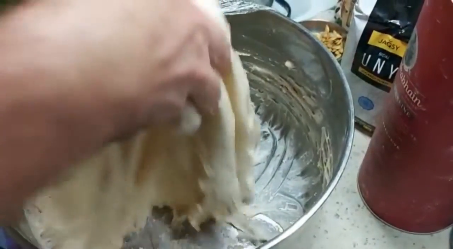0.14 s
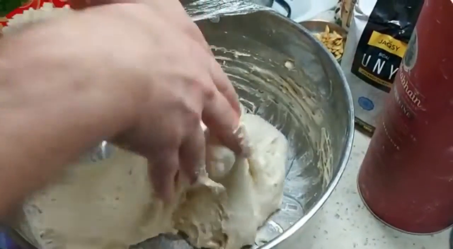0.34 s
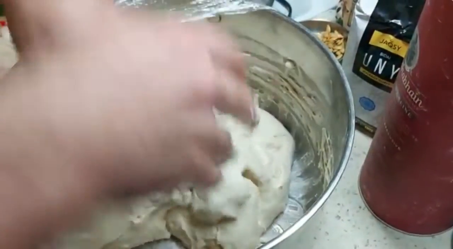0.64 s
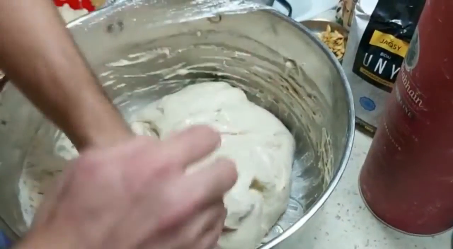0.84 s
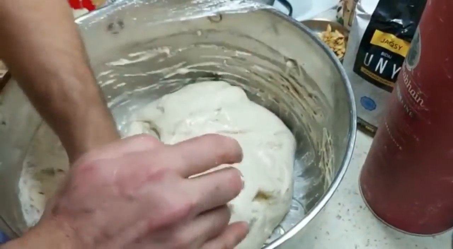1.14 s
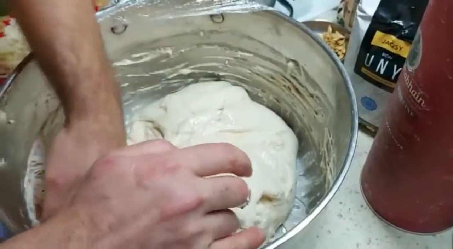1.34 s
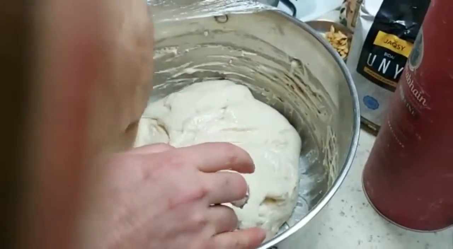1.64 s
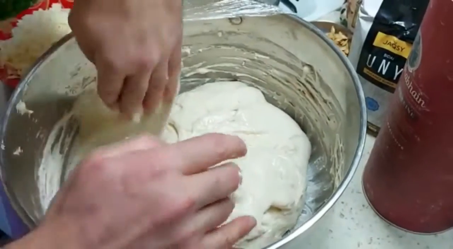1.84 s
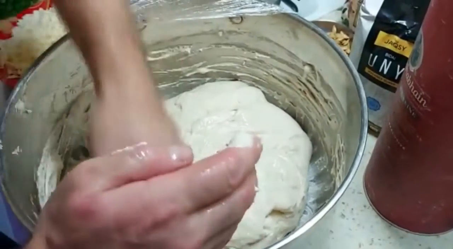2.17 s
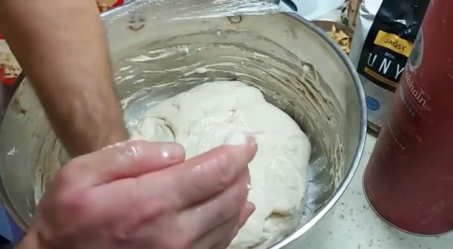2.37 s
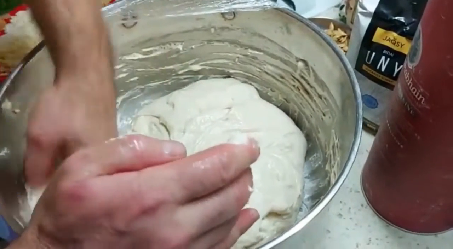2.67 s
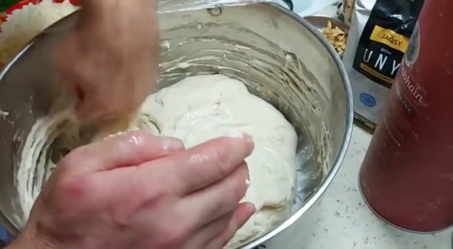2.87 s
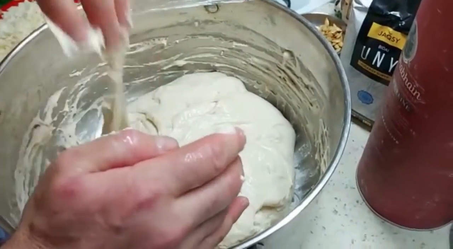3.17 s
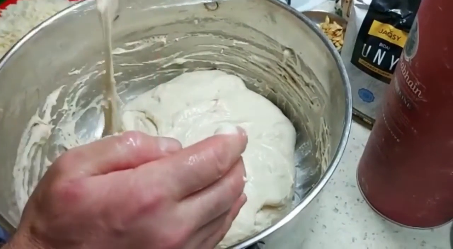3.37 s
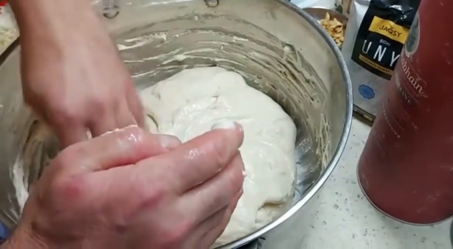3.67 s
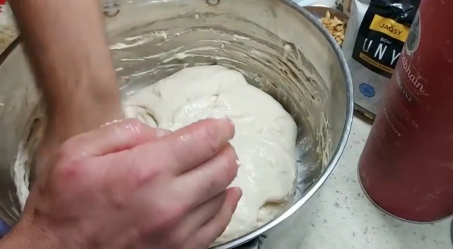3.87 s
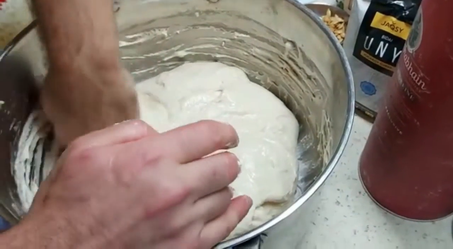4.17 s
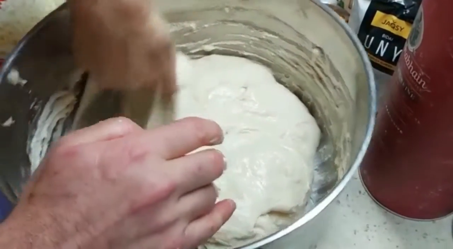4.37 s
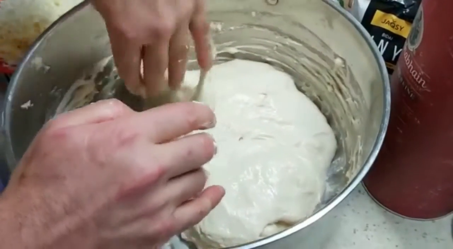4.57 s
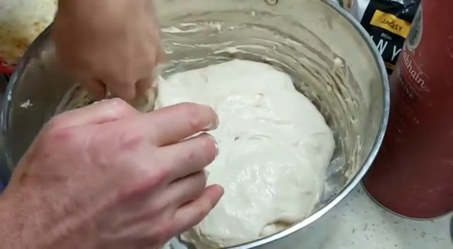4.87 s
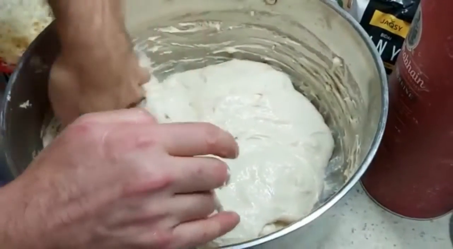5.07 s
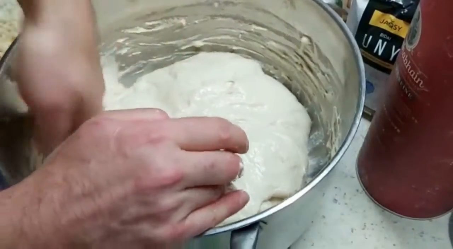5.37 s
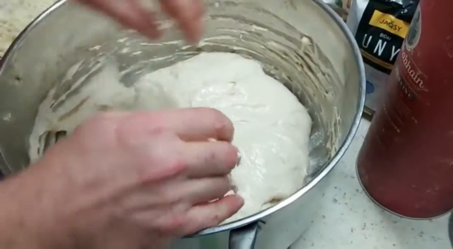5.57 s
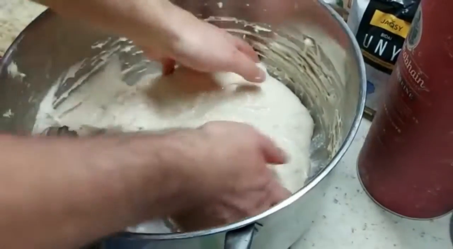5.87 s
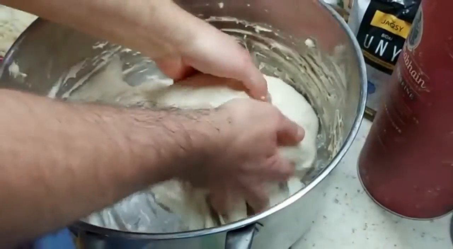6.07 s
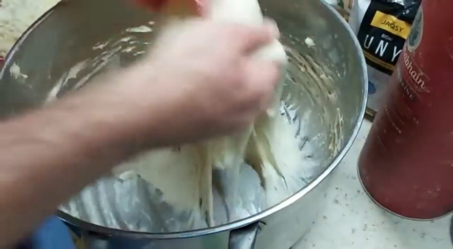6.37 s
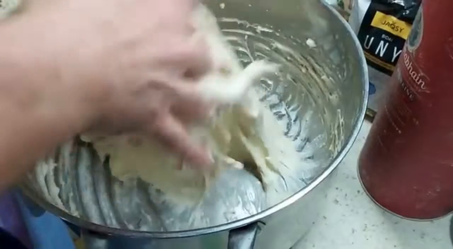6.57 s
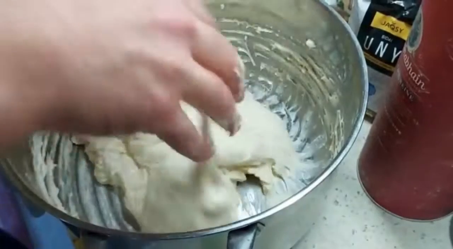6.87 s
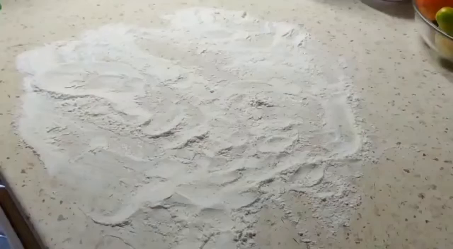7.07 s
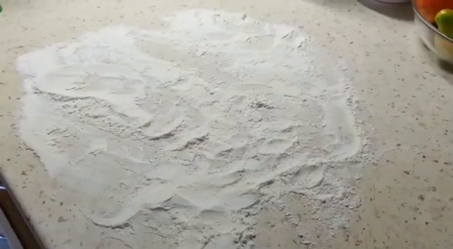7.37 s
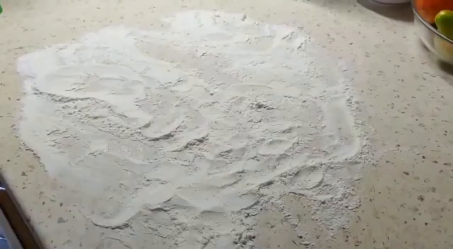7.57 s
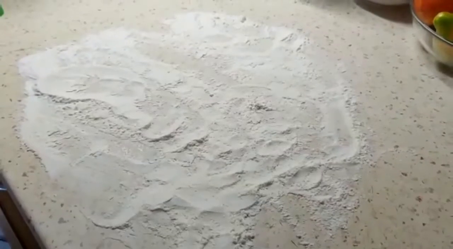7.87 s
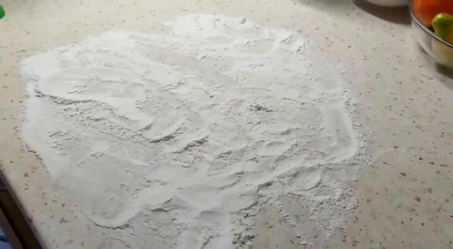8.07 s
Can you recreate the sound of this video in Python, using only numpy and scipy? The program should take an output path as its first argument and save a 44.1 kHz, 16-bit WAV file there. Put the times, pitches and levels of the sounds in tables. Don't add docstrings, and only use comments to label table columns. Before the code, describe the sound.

Wet dough peels and squelches off skin and metal in short uneven strokes, close to a phone and stronger on its right side. Hollow, quickly damped pot knocks interrupt, one with a loud sharp pop. A faint refrigerator hums behind. After seven seconds the handling ends, the hum becomes lower and nearer, and a light double tap lands on the counter.

```python
import sys
import numpy as np
from scipy import signal
from scipy.fft import rfft, irfft
from scipy.io import wavfile
from scipy.ndimage import uniform_filter1d

SR = 44100
rng = np.random.default_rng(int(sys.argv[2]) if len(sys.argv) > 2 else 0)


def generate_wav(signal):
    frames = np.transpose(np.atleast_2d(signal))
    scaled = np.clip(frames, -1, 1) * 32767
    pcm = np.round(scaled).astype(np.int16)
    wavfile.write(sys.argv[1], SR, pcm)


def level_to_linear(level):
    exponent = np.asarray(level, float) / 20
    return 10 ** exponent


N = 362502

# [f/Hz, level/dB per Hz]
FAR_AIR = [(15, -70), (25, -4), (55, 0), (76, -11), (117, -5), (157, 2.5), (195, -14), (236, -5),
           (270, -13.5), (531, -17.5), (1480, -37.5), (1890, -29.5), (3720, -48), (4370, -50.5),
           (16000, -49)]
NEAR_AIR = [(15, -45), (25, 2), (63, -9), (102, -18), (185, -9.5), (249, -18), (301, -14), (354, -20.5),
            (545, -34.5), (695, -30.5), (1290, -40.5), (2480, -41), (2690, -47), (7310, -50.5),
            (16000, -53.5)]
FAR_AIR_DB, NEAR_AIR_DB = -60.5, -61
# [f/Hz, level/dB]
FAR_TONES = [(48.4, -65), (155, -72.5), (236, -76), (300, -74.5), (689, -86), (1766, -87), (1916, -85),
             (2896, -89), (4180, -91), (5303, -102), (7364, -94)]
NEAR_TONES = [(49.2, -56.5), (100, -75), (152, -70), (199, -70), (237, -74), (300, -65.5), (491, -86),
              (689, -85), (1620, -93), (1766, -92), (2455, -87), (2902, -96), (4177, -93), (4764, -97),
              (5303, -99), (5749, -95), (7267, -93), (7400, -95), (7560, -95)]
# [f/Hz, likeness -1..1]
AIR_ALIKE = [(60, 0.88), (130, 0.96), (290, 0.84), (640, 0.48), (1410, -0.036), (3100, 0.043),
             (6820, -0.059), (15000, 1)]
SHAFT_HZ = 49.2
MOVE_S = 7.1

# [t/s, length/s, level/dB, squelch re peel/dB]
PEELS = [(0, 0.23, -73, -8), (0.17, 0.54, -65.5, -8), (0.629, 0.093, -61, -4), (0.96, 0.69, -63.5, -5.5),
         (1.49, 0.25, -65.5, 0), (1.61, 0.42, -67.5, -10), (2.338, 0.56, -68.5, -5),
         (2.65, 0.29, -62.5, -4), (2.944, 0.32, -79, -2), (3.67, 0.13, -72, -12), (3.792, 0.46, -79, -5),
         (3.973, 0.36, -71, -3), (4.167, 0.43, -63.5, -8), (4.48, 0.36, -66.5, -20),
         (5.104, 0.42, -68.5, -5), (5.648, 0.079, -71, -0.5), (5.74, 0.39, -62.5, -10),
         (5.991, 0.27, -53.5, -11), (6.247, 0.31, -58, -11), (6.45, 0.26, -62.5, -12),
         (6.64, 0.21, -61, -7), (6.848, 0.071, -68, -7), (7.01, 0.24, -80, 2.5)]
# [f/Hz, level/dB per Hz]
PEEL_COLOUR = [(4120, -41), (7000, -15.5), (9760, -6.5), (11200, -3.5), (12900, 3.5), (15100, 3.5),
               (16000, -14)]
SQUELCH_COLOUR = [(3500, -7), (4800, -4), (7000, -2), (9000, -5.5), (11000, -32)]
# [t/s, length/s, top f/Hz, start under top f/Hz, level/dB]
WHISTLES = [
    (3.785, .128, 12150, 1250, -78),
    (3.8, .1, 9250, 600, -80),
    (3.893, .057, 8450, -150, -81),
    (4.022, .085, 8050, 450, -76),
    (3.93, .03, 5750, 50, -80),
    (4.145, .025, 7600, 100, -78),
    (6.968, .025, 4050, 400, -65),
    (-.1, .75, 4180, 20, -89),
]
# [t/s, length/s, level/dB]
RUBS = [(.25, 0.18, -79), (.66, 0.044, -51.5), (.95, 0.091, -45.5), (1.1, 0.51, -60.5), (1.5, 0.23, -57.5),
        (1.6, 0.35, -66), (2.43, 0.37, -59.5), (2.55, 0.45, -57.5), (3.0, 0.27, -99), (3.72, 0.046, -50.5),
        (4.0, 0.36, -64.5), (4.2, 0.29, -69.5), (4.54, 0.078, -46), (5.14, 0.34, -61), (5.64, 0.12, -62),
        (5.82, 0.11, -59), (5.98, 0.34, -61.5), (6.33, 0.12, -68.5), (6.42, .12, -71.5), (6.63, 0.17, -62),
        (6.94, 0.2, -87)]
# [f/Hz, level/dB per Hz]
RUB_COLOUR = [(290, 1), (500, 1.5), (1280, -4), (2240, -12), (2450, -8), (4260, -12), (7000, -36.5),
              (9100, -57.5), (15400, -120)]
# [f/Hz, width/Hz, level/dB]
RUB_RINGS = [(690, 50, 3), (1060, 60, 3), (1830, 90, 6), (2160, 80, 11), (2270, 80, 14), (2750, 100, 7),
             (3280, 120, 3), (3830, 130, 4), (4300, 120, 6), (4850, 120, 11), (5450, 180, 12)]
PRESS, EASE = .45, .45
REST_PEEL_DB, REST_RUB_DB = -79.5, -80.5

# [t/s, peak level/dB, centre f/Hz]
SMACKS = [(0.0945, -54.5, 8200), (0.2794, -54, 11400), (0.322, -54.5, 5560), (0.3426, -52.5, 11900),
          (0.6807, -44.5, 12200), (0.757, -59.5, 8500), (0.365, -67, 6040), (0.498, -72, 6000),
          (1.252, -53, 6500), (1.458, -56, 7000), (1.782, -59, 6000), (2.77, -49.5, 6500),
          (5.974, -59, 5000), (6.886, -73, 4970), (0.9846, -53.5, 5900), (3.741, -42.5, 8350),
          (4.2482, -48, 8040), (4.3737, -49.5, 11100), (4.574, -42, 6060), (5.0213, -60, 6120),
          (5.251, -54, 10700), (5.8646, -74, 4730), (6.55, -48.5, 7200), (6.739, -45, 11700),
          (8.132, -50, 8000), (1.8227, -59.5, 3870), (6.243, -52, 6660), (4.528, -60, 8600),
          (4.666, -61, 8000), (3.734, -49, 7500)]
# [t/s, peak level/dB, t60/s]
SNAPS = [(0.2299, -58, 0.04), (0.3004, -48.5, 0.056), (0.3637, -49, 0.17), (0.497, -50, 0.054),
         (1.2507, -50, 0.11), (1.3409, -54, 0.2), (1.5424, -53, 0.34), (1.939, -57, 0.16),
         (1.9754, -52, .037), (2.5247, -57, .051), (2.954, -55, 0.083), (3.674, -56, .03),
         (3.98, -46.5, 0.052), (4.2911, -42, 0.028), (4.3241, -65, .07), (4.417, -52, .05),
         (5.202, -51.5, 0.029), (5.278, -52.5, 0.2), (5.9728, -50, 0.052), (6, -43.5, .051),
         (6.197, -43, 0.011), (6.225, -44, 0.28), (6.295, -49, 0.091), (6.686, -52, 0.23), (6.721, -49, .1),
         (6.966, -44.5, 0.042), (0.4349, -60, .04), (0.815, -64, .03), (1.8213, -54, .04),
         (2.2633, -62, .03), (2.7397, -55, .04), (2.9362, -59, .03), (3.163, -57.5, .04),
         (3.9509, -58, .03), (4.102, -60, .03), (4.2323, -55, .03), (4.4363, -53, .03), (4.452, -50, .03),
         (4.5486, -52, .03), (4.6134, -46, 0.056), (4.6643, -55, .04), (5.668, -63, .03), (5.897, -53, .03),
         (5.921, -61, .03), (5.9469, -52, .03), (6.36, -50, .04), (6.3965, -46, .04), (6.4787, -56, .03),
         (6.9177, -58, .03), (7.0279, -59, .03), (.707, -53, .02), (.733, -61, .02), (.882, -65, .02),
         (1.266, -54, .03), (4.303, -49, .02), (6.106, -54, .03), (6.43, -51, .03), (6.505, -48, .03)]
SNAP_HZ, SMACK_T60_S = 14700, .045
# [t/s, peak level/dB, pocket f/Hz, t60/s]
POPS = [(0.29, -55, 1060, 0.082), (.345, -49, 566, 0.041), (.676, -41.5, 683, 0.025),
        (0.672, -40.5, 1170, 0.038), (0.67, -64, 2160, 0.036), (2.678, -44, 2255, 0.27),
        (5.713, -40.5, 294, 0.087), (1.454, -52.5, 2600, 0.043), (3.737, -42, 747, 0.053),
        (3.737, -47, 2510, 0.037), (4.073, -53, 1193, 0.03), (4.29, -58, 3300, 0.12),
        (4.304, -48, 6100, 0.027), (2.469, -54, 1110, 0.065), (5.865, -37.5, 4340, 0.036),
        (5.865, -41.5, 2450, 0.037), (5.868, -51, 718, 0.18), (6.257, -46, 1395, 0.023),
        (6.343, -51.5, 1780, 0.037), (6.345, -66, 4500, 0.037), (6.365, -52, 2800, .04),
        (5.864, -44, 3100, 0.066), (6.198, -56, 5430, 0.04), (6.444, -46, 540, 0.098),
        (6.447, -52.5, 1668, 0.054), (6.687, -47, 1009, 0.063), (6.726, -53, 1066, 0.034),
        (6.749, -40.5, 1880, 0.012), (6.98, -52, 2080, 0.037), (7.032, -53, 1990, 0.03),
        (6.689, -46, 1710, 0.025), (6.405, -57, 1490, 0.043), (6.41, -56, 2970, 0.027),
        (6.445, -50, 4830, 0.056), (6.446, -52.5, 1010, 0.047), (6.195, -54, 3000, .03),
        (6.87, -62, 2000, .04), (1.262, -52, 2300, .1), (1.365, -54, 2180, .07), (1.385, -52, 1086, 0.043),
        (1.464, -54.5, 1090, 0.061), (1.553, -54, 2250, 0.064), (1.575, -56.5, 1037, 0.16),
        (1.631, -62, 1830, 0.21), (2.488, -56, 1080, 0.029), (2.768, -52, 2300, 0.045),
        (5.687, -52, 3060, 0.038), (4.575, -35.5, 4540, 0.032), (4.575, -21.5, 2435, .04),
        (4.602, -30, 2260, 0.051)]
POP_RISE_CYCLES = 8.3
# [t/s, peak level/dB]
TICKS = [(.301, -54), (.365, -60), (.678, -35.5), (3.741, -43.5), (4.373, -54), (5.866, -44), (5.973, -59),
         (6.261, -41.5), (6.345, -48), (6.353, -52), (6.088, -46), (6.446, -49), (6.457, -52), (6.689, -56),
         (6.727, -51), (6.75, -40), (6.982, -56), (7.034, -59)]
# [t/s, peak level/dB]
SKIDS = [
    (0.96, -54),
    (4.56, -31.5),
    (6.005, -44.5),
]
# [f/Hz, level/dB per Hz]
TICK_COLOUR = [(400, -2), (900, -3), (1900, 6), (3500, -13.5), (6000, -16), (12000, -25)]
TICK_T60_S, TICK_RISE_S = .03, .0008
SKID_T60_S, SKID_RISE_S = .14, .016

# [t/s, body level/dB, counter level/dB, wall level/dB, rim level/dB]
KNOCKS = [(0.304, -50, -64, -57, -73), (0.322, -45, -47.5, -61, -82), (0.679, -36.5, -45, -66, -92),
          (0.759, -43.5, -89, -79, -96), (0.983, -18.5, -31, -23.5, -32), (1.02, -32, -47, -34.5, -52),
          (1.063, -38, -47, -43.5, -63), (1.337, -53, -60, -57, -75), (2.411, -47, -53, -60, -66.5),
          (3.978, -30, -35, -45.5, -62), (4.06, -59, -57, -58, -62), (4.139, -53, -47.5, -67, -79),
          (4.573, -19, -29, -18, -24), (4.603, -21, -37.5, -27.5, -40), (4.642, -25.5, -60, -42, -61),
          (4.668, -47, -44, -41.5, -60), (5.688, -29, -42, -43.5, -56), (5.713, -22.5, -35.5, -40, -58),
          (5.747, -39, -58, -57, -81), (5.77, -41, -46.5, -49.5, -77), (6.027, -23.5, -40, -29, -39),
          (6.09, -49, -55, -48, -50.5), (6.251, -34.5, -42.5, -39, -54), (6.298, -35, -40.5, -44, -58),
          (6.328, -68, -47, -50, -63), (6.748, -53, -54, -56, -63), (8.156, -54, -48.5, -61, -64)]
# [f/Hz, level/dB, t60/s]
COUNTER = [(53.5, -16, 0.7), (78.4, -19, 0.71), (98.5, 4.5, 0.48), (115.1, -5, 0.94)]
BODY = [(128, -12.5, 0.4), (153.1, 5.5, 0.3), (163.9, -10, 0.29)]
WALL = [(238.8, -1.5, 0.19), (315, -2.5, 0.2), (343.2, 1.5, 0.18), (438, -11, 0.41), (455.7, -1.5, 0.16),
        (576, -1.5, 0.078), (688, -6, 0.14)]
RIM = [(703, -10, 0.24), (1080, -5, 0.27), (1454, -25, .12), (1628, -1.5, 0.19), (1730, -7, 0.09),
       (2017, -1, 0.094), (2250, -22, 0.23), (2570, -1, 0.08), (2770, -10, 0.1), (3180, -19, 0.2),
       (3600, -5.5, 0.018), (4620, -9, 0.056)]
# [f/Hz, level/dB per Hz]
CLANG_COLOUR = [(410, -40), (800, -4.5), (1300, 2), (2500, -4), (3240, -8.5), (4690, -29.5), (5670, -68),
                (6090, -22.5), (12000, -88), (15600, -87.5), (22000, -120)]
STRIKE_S, STRIKE_DB = .0009, 7

# [t/s, peak level/dB]
TAPS = [
    (8.133, -41.5),
    (8.174, -27),
]
# [f/Hz, level/dB per Hz]
TAP_COLOUR = [(300, -5), (700, 3.5), (1200, 2), (2000, -3), (4000, -23.5), (9000, -41)]
TAP_T60_S, TAP_RISE_S = .028, .00068

# [f/Hz, left minus right/dB]
PORTS = [(60, 0), (110, -1), (200, -0.5), (380, -0.5), (700, -2.5), (1290, -7), (2380, -9), (4400, -14),
         (8120, -2.5), (15000, -8)]
LEFT_LAG_S = 1 / 6100
# [f/Hz, level/dB]
ECHO_COLOUR = [(120, -20.0), (350, -8.5), (900, -2.0), (5000, 4.0), (14000, -9.5)]
ROOM_T60_S, ROOM_DB = 0.15, -2
TOP_HZ = 15830


def colour(x, points, delay_s=0., scale=0.88):
    f = np.fft.rfftfreq(x.shape[-1], 1 / SR) + 0.0015
    hz, db = np.transpose(points)
    gain = level_to_linear(scale * np.interp(np.log(f), np.log(hz), db))
    lag = np.exp(-2j * np.pi * np.minimum(f * delay_s, 1))
    return irfft(rfft(x) * gain * lag, x.shape[-1])


def unit(x):
    return x / np.sqrt(np.mean(x ** 2))


def walk(rate):
    k = int(SR / rate)
    steps = np.repeat(rng.standard_normal(N // k + 1), k)
    return unit(uniform_filter1d(uniform_filter1d(steps, k), k)[:N])


def add(track, s, sound):
    i = int(s * SR)
    track[i:i + len(sound)] += sound[:N - i]


def fade(t, t60):
    return np.exp(-np.log(1000) * t / t60)


def rise(t, rise_s):
    return 1 - np.exp(-t / rise_s)


def burst(t, t60, rise_s):
    shape = rise(t, max(rise_s, .0002)) * fade(t, np.clip(t60, .01, .4))
    return shape / shape.max()


def crackle(size, rate, spread_db, hiss):
    strength = level_to_linear(spread_db * np.minimum(rng.exponential(size=size), 3))
    clicks = (rng.random(size) < rate / SR) * strength * rng.choice([-1, 1], size)
    return clicks * np.sqrt(SR / rate) + hiss * rng.standard_normal(size)


def strokes(rows, rest_db):
    t = np.arange(N) / SR
    out = level_to_linear(rest_db) * (t < MOVE_S)
    for s, length_s, db in rows:
        u = (t - s) / length_s
        pressure = np.clip(np.minimum(u / PRESS, (1 - u) / EASE), 0, 1)
        out = out + level_to_linear(db) * np.sin(np.pi / 2 * pressure) ** 2
    return out


def fridge(air, air_db, tones, wobble_db, blur_cycles):
    hz, alike = np.transpose(AIR_ALIKE)
    alike = np.clip(alike, -1, 1)
    mid = colour(rng.standard_normal(N), np.c_[hz, 10 * np.log10(1.001 + alike)])
    side = colour(rng.standard_normal(N), np.c_[hz, 10 * np.log10(1.001 - alike)])
    noise = unit(colour(np.array([mid + side, mid - side]), air))
    noise = noise * level_to_linear(air_db + 0.8 * walk(6))
    t = np.arange(N) / SR
    hum = 0
    for f, db in tones:
        quick = blur_cycles * (walk(90) + np.array([walk(60), walk(60)]))
        slow = np.array([walk(6), walk(6)])
        tremble = .6 * np.sin(2 * np.pi * SHAFT_HZ * t + f)
        cycles = min(f / 9000, .2) * (quick + slow + tremble)
        swell_db = (wobble_db + 2 * blur_cycles * min(f / 1500, 1)) * walk(20)
        hum = hum + level_to_linear(db + swell_db) * np.sin(2 * np.pi * (f * t + cycles))
    return noise + np.sqrt(2) * hum


def peeling(grip_db):
    pull = strokes([row[:3] for row in PEELS], REST_PEEL_DB)
    wet_rows = [(s, length_s, db + wet_db) for s, length_s, db, wet_db in PEELS]
    squeeze = strokes(wet_rows, REST_PEEL_DB - 1.5)
    threads = crackle(N, 500, 3.2, 1.6)
    patches = 0
    for hz in (7000, 8800, 10500, 12200, 13800, 15300):
        patches = patches + level_to_linear(3 * walk(35)) * signal.lfilter(*signal.iirpeak(hz, 4, SR), threads)
    peel = unit(colour(patches, PEEL_COLOUR)) * pull * level_to_linear(-5.0 + grip_db)
    bubbles = .5 * threads + crackle(N, 900, 2.5, 2.2)
    squelch = unit(colour(bubbles, SQUELCH_COLOUR)) * squeeze
    squelch = squelch * level_to_linear(-4.5 + 0.6 * grip_db + 2.2 * walk(50))
    aside = unit(colour(crackle(N, 500, 3.8, 2.5), PEEL_COLOUR)) * pull * level_to_linear(-12 + grip_db)
    return peel + squelch, aside


def whistles():
    out, t = np.zeros(N), np.arange(N) / SR
    for s, length_s, top_hz, sag_hz, db in WHISTLES:
        arch = np.clip(1 - (2 * (t - s) / length_s - 1) ** 2, 0, 1)
        hz = (top_hz - sag_hz * (1 - arch)) * (1 + 0.005 * walk(300))
        tone = np.sin(2 * np.pi * np.cumsum(hz) / SR)
        out += np.sqrt(2) * level_to_linear(db - 2 + 2.5 * walk(60)) * arch ** .4 * tone
    return out


def rubbing(grip_db):
    slips = colour(crackle(N, 700, 1.5, 1.26), RUB_COLOUR)
    rings = 0
    for hz, width_hz, db in RUB_RINGS:
        resonance = signal.lfilter(*signal.iirpeak(hz, hz / width_hz, SR), slips)
        rings = rings + level_to_linear(db + 3.2 * walk(50)) * resonance
    level = level_to_linear(-5.5 + .5 * grip_db + 1.2 * walk(90))
    return unit(slips + rings) * strokes(RUBS, REST_RUB_DB) * level


def snaps_and_smacks():
    out, t = np.zeros(N), np.arange(8192) / SR
    snaps = [(s, db, SNAP_HZ, t60) for s, db, t60 in SNAPS]
    for s, db, hz, t60 in snaps + [(*row, SMACK_T60_S) for row in SMACKS]:
        band = [(hz / 20, -38), (hz / 3, -30), (hz / 1.93, -13), (hz, 0), (hz * 1.4, -8), (hz * 3, -14)]
        threads = unit(colour(crackle(len(t), 2300, 0.88, 3.1), band))
        envelope = burst(t, t60, 0.0012) * (0.82 + 1.1 * fade(t, 0.012))
        add(out, s - .0005, level_to_linear(db - 7) * envelope * threads)
    return out


def pops():
    out, t = np.zeros(N), np.arange(8192) / SR
    for s, db, hz, t60 in POPS:
        band = [(hz / 3, -35), (hz / 1.25, -14), (hz, 0), (hz * 1.2, -14), (hz * 1.8, -24), (hz * 5, -45)]
        tear = unit(colour(crackle(len(t), 1200, 0.77, 0.85), band))
        tone = np.sin(2 * np.pi * hz * t) * min(1600 / hz, 1)
        envelope = burst(t, t60, POP_RISE_CYCLES / hz)
        add(out, s - .0005, level_to_linear(db - 11.0) * envelope * (1.38 * tone + 0.77 * tear))
    return out


def ticks_and_skids():
    out, t = np.zeros(N), np.arange(8192) / SR
    ticks = [(*row, TICK_T60_S, TICK_RISE_S) for row in TICKS]
    skids = [(*row, SKID_T60_S, SKID_RISE_S) for row in SKIDS]
    for s, db, t60, rise_s in ticks + skids:
        noise = unit(colour(rng.standard_normal(len(t)), TICK_COLOUR))
        add(out, s - .0005, level_to_linear(db - 10.5) * burst(t, t60, rise_s) * noise)
    return out


def ring(modes, t, stretch, scatter_db):
    hz, db, t60 = np.transpose(modes)[:, :, None]
    chance = rng.standard_normal((4, len(hz), 1))
    decay = fade(t, t60 * stretch) * (.5 + 0.33 * fade(t, 0.23))
    rocking = 1 + 0.65 * np.sin(2 * np.pi * 16 * (1 + 0.28 * chance[2]) * t + chance[3])
    swing = np.sin(2 * np.pi * hz * (1 + 0.0051 * chance[0]) * t)
    return np.sum(level_to_linear(db + scatter_db * chance[1]) * decay * rocking * swing, axis=0)


def pot():
    out, t = np.zeros(N), np.arange(SR // 2) / SR
    strike = -np.sin(np.pi * np.minimum(t / STRIKE_S, 1)) ** 2
    for s, body_db, counter_db, wall_db, rim_db in KNOCKS:
        counter = level_to_linear(counter_db) * ring(COUNTER, t, 1, 4.0)
        body = level_to_linear(body_db - 5.5) * ring(BODY, t, 1, 1.15)
        wall = level_to_linear(wall_db - 3.5) * ring(WALL, t, 1, 3.14)
        clang = unit(colour(rng.standard_normal(len(t)), CLANG_COLOUR))
        clang = clang * (fade(t, 0.05) + 0.16 * fade(t, 0.31))
        rim = level_to_linear(rim_db - 2.5) * (clang + 0.56 * ring(RIM, t, 0.62, 4.7))
        knock = (counter + body) * rise(t, 0.0033) + wall * rise(t, 0.0018) + rim * rise(t, 0.00041)
        add(out, s, knock + level_to_linear(rim_db + STRIKE_DB) * strike)
    return out


def taps():
    out, t = np.zeros(N), np.arange(8192) / SR
    for s, db in TAPS:
        noise = unit(colour(rng.standard_normal(len(t)), TAP_COLOUR))
        add(out, s, level_to_linear(db - 12.0) * burst(t, TAP_T60_S, TAP_RISE_S) * noise)
    return out


def kitchen(close):
    t = np.arange(SR // 2) / SR
    echo = rng.standard_normal((2, len(t))) * fade(t, ROOM_T60_S) * (t > .002)
    echo = colour(echo / np.sqrt(np.sum(echo ** 2) / 2), ECHO_COLOUR)
    return level_to_linear(ROOM_DB) * signal.fftconvolve(close[None], echo, axes=1)[:, :N]


def scene():
    far_floor = fridge(FAR_AIR, FAR_AIR_DB, FAR_TONES, 1.2, .75)
    near_floor = fridge(NEAR_AIR, NEAR_AIR_DB, NEAR_TONES, .8, .15)
    near = np.clip((np.arange(N) / SR - MOVE_S) / 0.07, 0, 1)
    floor = (1 - near) * far_floor + near * near_floor
    grip_db = 2.2 * walk(45)
    peel, aside = peeling(grip_db)
    close = peel + whistles() + rubbing(grip_db)
    close = close + snaps_and_smacks() + pops() + ticks_and_skids() + pot() + taps()
    wet = kitchen(close)
    left = colour(close, PORTS, LEFT_LAG_S, 1.0) + colour(wet[0], PORTS, scale=0.16) + aside
    right = colour(close, PORTS, scale=-0.69) + colour(wet[1], PORTS, scale=0.87)
    left = left + colour(floor[0], PORTS, scale=0.037)
    right = right + colour(floor[1], PORTS, scale=-0.53)
    return np.array([left, right])


def band_limit(x):
    return signal.sosfilt(signal.butter(12, 16490, fs=SR, output="sos"), x)


def record(dry):
    mix = colour(dry, [(TOP_HZ - 40, 0), (TOP_HZ + 40, -70)])
    return band_limit(mix)


dry = scene()
out = record(dry)
generate_wav(out)
```